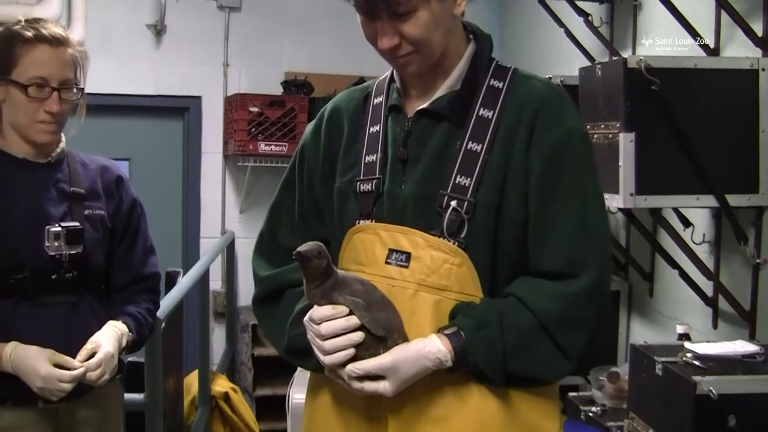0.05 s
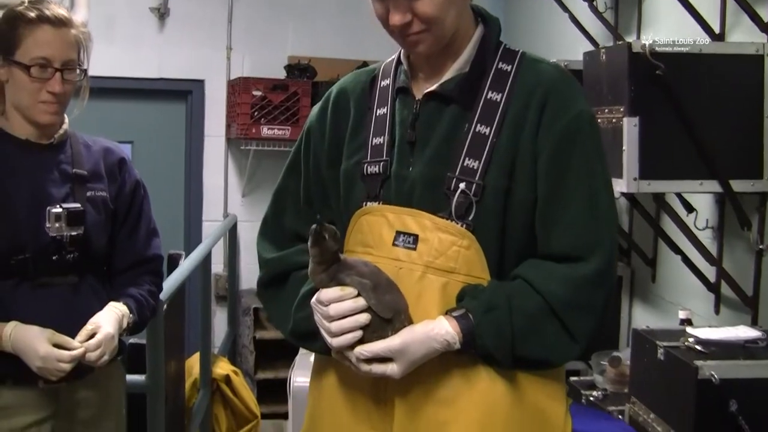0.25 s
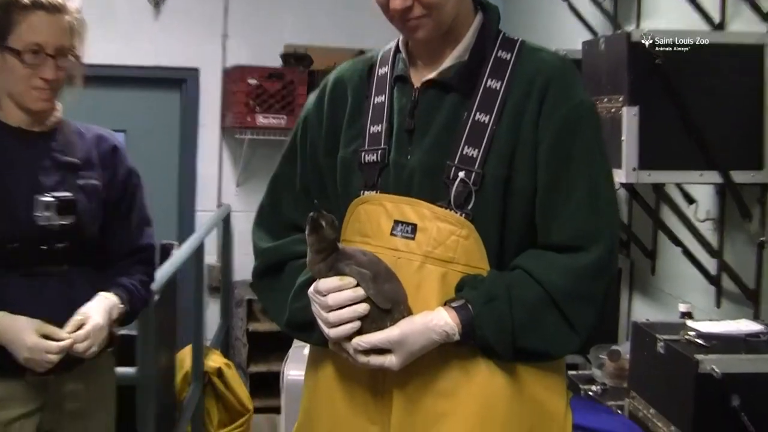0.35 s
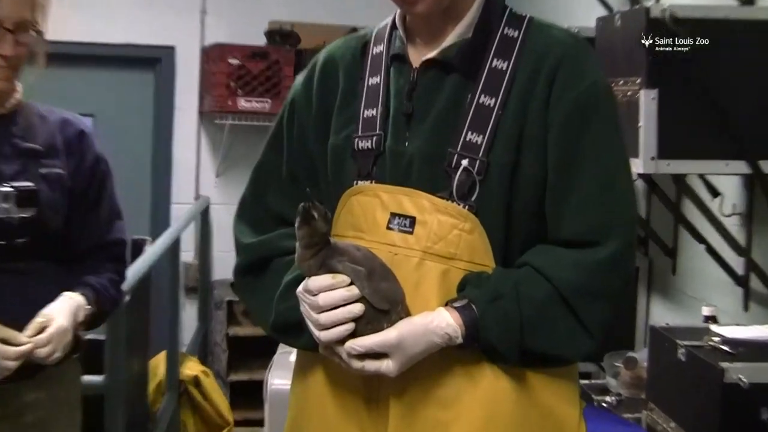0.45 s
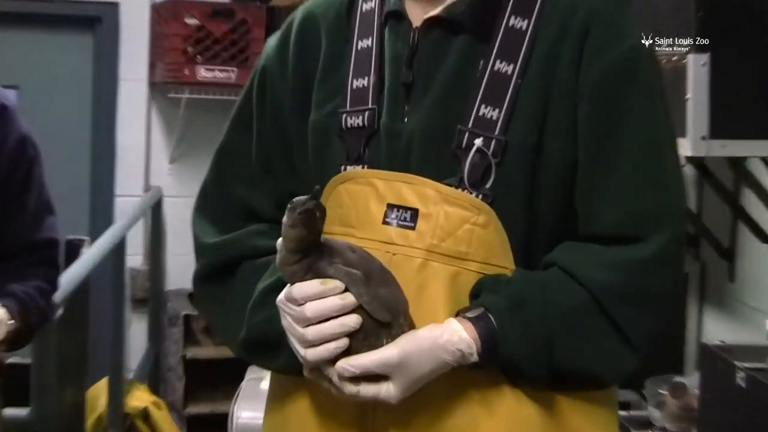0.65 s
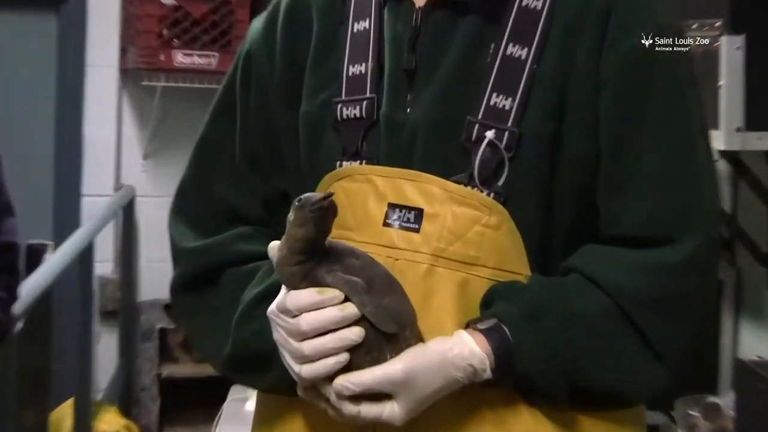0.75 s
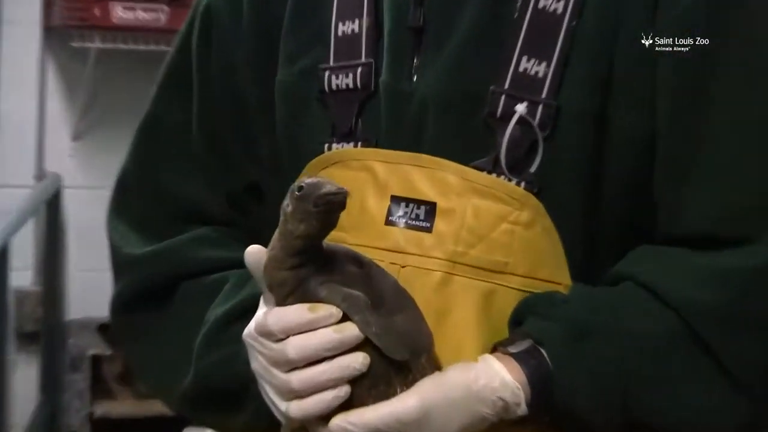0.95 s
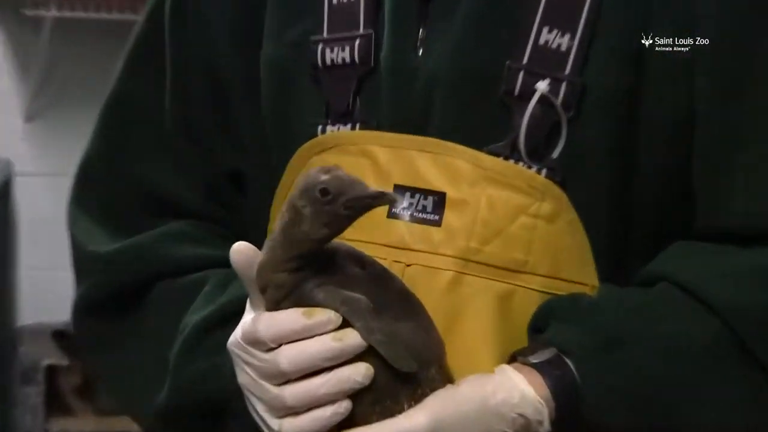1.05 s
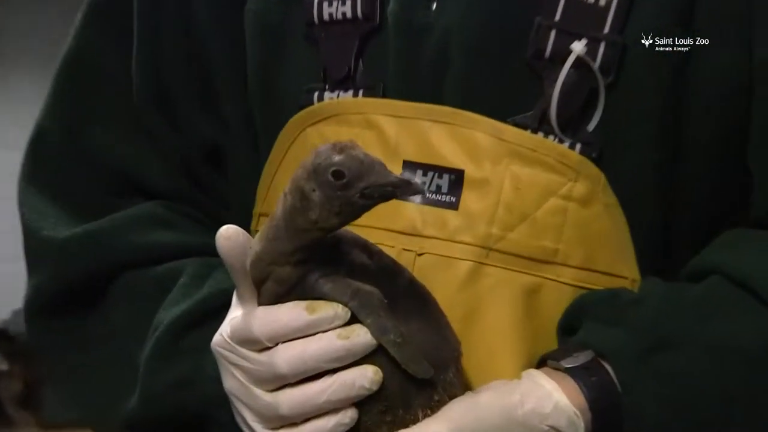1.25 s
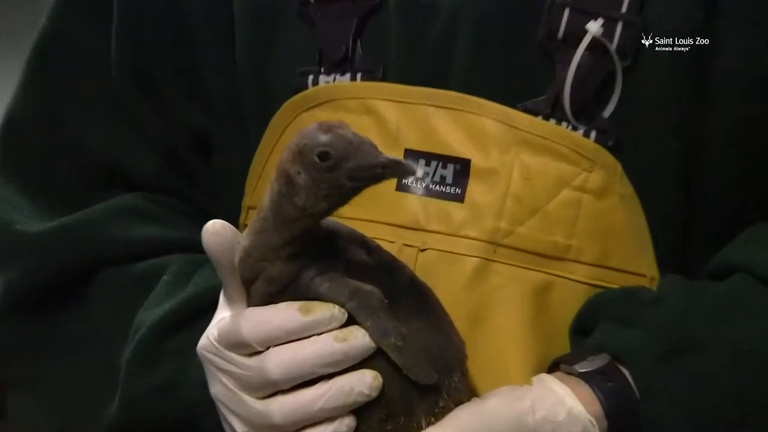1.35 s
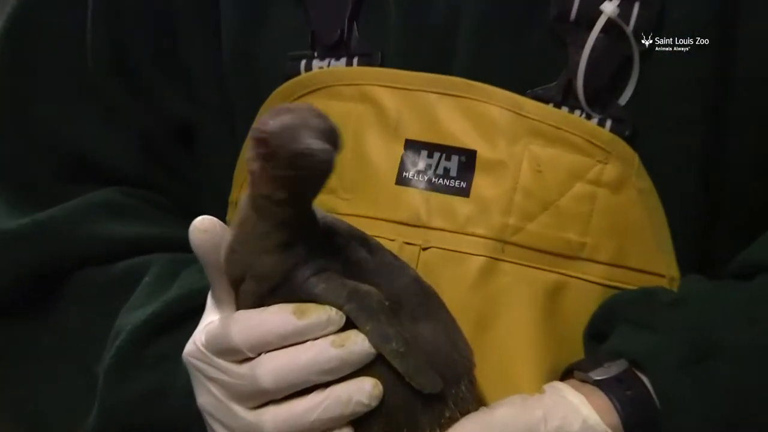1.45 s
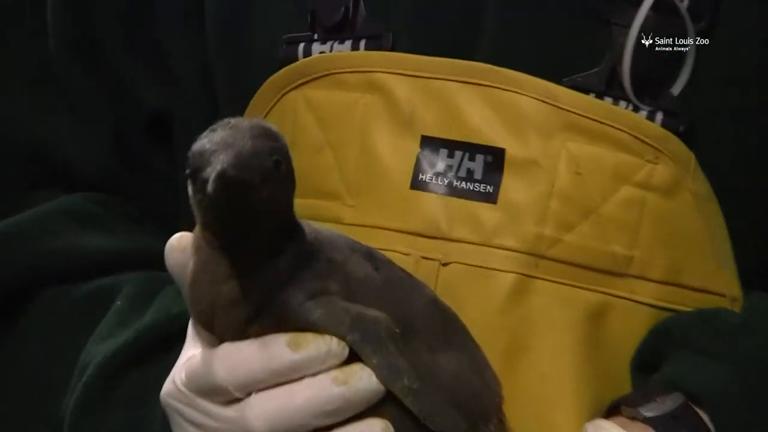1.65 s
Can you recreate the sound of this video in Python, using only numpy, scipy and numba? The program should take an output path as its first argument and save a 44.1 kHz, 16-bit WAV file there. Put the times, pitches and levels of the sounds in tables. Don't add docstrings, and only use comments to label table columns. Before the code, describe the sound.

Single shrill chick whistle rises, breaks into a hoarse lower note, over indoor ventilation hum

```python
import sys
import numpy as np
from scipy import signal
from scipy.fft import rfft, irfft
from scipy.io import wavfile
from scipy.ndimage import uniform_filter1d, map_coordinates
from numba import njit

SR = 44100
rng = np.random.default_rng(int(sys.argv[2]) if len(sys.argv) > 2 else 0)


def dump_mix(stems):
    frames = np.atleast_2d(stems).T
    limited = np.clip(frames, -1, 1)
    pcm = np.round(limited * 32767).astype(np.int16)
    wavfile.write(sys.argv[1], SR, pcm)


def voltage_ratio(level):
    return 10 ** (np.asarray(level, float) / 20)


N = 74970
t = np.arange(N) / SR

# pitch_hz [Hz], density_db [dB per Hz]
AIR_COLOUR = [(25, -24), (50, -23), (180, 0.5), (420, -11), (1270, -18.5), (3500, -25.5), (10000, -32),
              (15500, -41)]
# pitch_hz [Hz], width_hz [Hz], level_db [dB]
MACHINE_DRONES = [(31.4, 18.3, -36), (82.3, 11, -38.5), (125.6, 26.7, -33.5), (190.6, 38, -41.5),
                  (248.3, 23.6, -37.5), (2770, 180, -52)]
# pitch_hz [Hz], reverberation_s [s]
WALL_RING = [(1400, 0.22), (2800, 0.43), (5600, 0.41), (11000, 0.31)]
# time_s [s], pitch_hz [Hz]
WHISTLE_PITCH = [
    (.216, 3140),
    (.24, 3130),
    (.265, 3010),
    (.3, 3230),
    (.35, 3525),
    (.4, 3490),
    (.432, 3400),
]
# time_s [s], pitch_hz [Hz]
BROKEN_PITCH = [
    (.458, 2400),
    (.474, 2370),
    (.503, 2830),
    (.53, 2820),
    (.55, 2470),
    (.575, 2320),
    (.648, 2290),
    (.69, 2010),
]
# time_s [s], level_db [dB], hoarse_db [dB], overtones_db [dB], jitter [fraction of pitch]
STRAIN = [
    (.217, 1, -5, -13, 0),
    (.227, 3, -24.5, -1, 0.03),
    (.3, 15, -38, -9, 0),
    (.366, 4.5, -52, 10.5, 0.02),
    (.383, 1, -11, -4, 0.02),
    (.44, 2, -10.5, -3, 0),
    (.485, 0.5, -11, 7.5, .012),
    (.6, 2.5, -14.5, 12, 0),
    (.7, -2.5, -16, 10, 0),
]
# multiple [times the pitch], level_db [dB]
WHISTLE_OVERTONES = [(2, -19.5), (3, -27.5), (4, -32.5), (5, -33.5), (6, -38)]
# multiple [times the pitch], level_db [dB]
HALF_OVERTONES = [(1.5, 0), (2.5, -8), (3.5, -16)]
# middle_s [s], length_s [s], level_db [dB]
PERIOD_DOUBLINGS = [
    (.219, .006, -18),
    (.388, .02, -22),
    (.635, .05, -16),
]
# pitch_hz [Hz], gain_db [dB]
THROAT_COLOUR = [(4000, -0.5), (4700, 0), (5500, -6.5), (6100, 1.5), (7000, -1), (8500, 0.5), (11500, -0.5),
                 (15000, -4)]
# pitch_hz [Hz], density_db [dB per Hz]
HOARSE_COLOUR = [(1700, -25), (2300, -14), (3300, -1.5), (5000, -12), (6100, -12.5), (8000, -9),
                 (12000, -10.5), (16000, -23)]

TOP_HZ = 15750
HUM_DB, SWELL_DB, FLICKER_DB = -28, 1.5, 1.5
HUM_PAN_DB, HUM_LAG_S, HUM_APART_HZ = -3.8, .0001, 1600
ROOM_DB, ROOM_GAP_S = 1, 0.003
START_S, ATTACK_S, END_S, RELEASE_S = .2157, .003, 0.6883, 0.015
GLIDE_S, WAVER, WAVER_PER_S = 0.013, .0015, 40
CHICK_PAN_DB, CHICK_LAG_S = -3.5, -0.000032
LEFT_SHADE_HZ, LEFT_SHADE = 7040, 0.55
KNEE_DB, RATIO, RECOVER_DB_PER_S = -29.5, 2.356, 35.5
SENSE_S, DUCK_S = 0.024, .025


def level(x, db):
    return x * voltage_ratio(db) / np.sqrt(np.mean(x ** 2))


def curve(table, index):
    rows = np.array(table)
    return np.interp(t, rows[:, 0], rows[:, index])


def colour_db(table, hz):
    rows = np.array(table)
    return np.interp(np.log(hz), np.log(rows[:, 0]), rows[:, 1])


def band(x, hz, width_hz):
    edges = [max(hz - width_hz / 2, 5), min(hz + width_hz / 2, .49 * SR)]
    return signal.sosfilt(signal.butter(2, edges, "band", fs=SR, output="sos"), x)


def walk(rate):
    hold = int(SR / rate)
    held = rng.standard_normal(1000)[np.arange(N) // hold % 1000]
    return 1.3 * uniform_filter1d(uniform_filter1d(held, hold), hold)


def pair(x, pan_db, lag_s):
    late = map_coordinates(x, [(t - lag_s) * SR], mode="nearest")
    return np.array([late * voltage_ratio(pan_db / 2), x * voltage_ratio(-pan_db / 2)])


def ventilation():
    air = 0
    swell = walk(1.33)
    for hz in 25 * 2 ** np.arange(0, 9.4, 1 / 3):
        shared, left, right = band(rng.standard_normal((3, N)), hz, hz / 4)
        apart = min(hz / HUM_APART_HZ, 1) ** 1.3
        both = np.sqrt(1 - apart) * pair(shared, 0, HUM_LAG_S) + np.sqrt(apart) * np.array([left, right])
        air = air + voltage_ratio(colour_db(AIR_COLOUR, hz) + SWELL_DB * swell + FLICKER_DB * walk(11.68)) * both
    return level(air, HUM_DB)


def machines():
    return sum(level(band(rng.standard_normal(N), hz, width), db) for hz, width, db in MACHINE_DRONES)


def hum():
    return (ventilation() + machines()) * voltage_ratio(np.array([[HUM_PAN_DB], [-HUM_PAN_DB]]) / 2)


def room(x):
    tail = 0
    for hz, t60 in WALL_RING:
        tail = tail + band(rng.standard_normal((2, N)), hz, .7 * hz) * voltage_ratio(-60 * t / t60)
    tail = tail * np.clip(t / ROOM_GAP_S - 1, 0, 1)
    tail = tail * voltage_ratio(ROOM_DB) / np.sqrt(np.sum(tail ** 2) / 2) / 2
    return signal.fftconvolve(x, tail, axes=1)[:, :N]


def partials(rows, hz, phase):
    total = 0
    for multiple, db in rows:
        line_db = db + colour_db(THROAT_COLOUR, multiple * hz) + 4.7 * walk(81.02)
        total = total + voltage_ratio(line_db) * np.sin(multiple * phase) * (multiple * hz < TOP_HZ)
    return total


def hoarse_air():
    bins_hz = np.arange(N // 2 + 1) * SR / N + 1
    air = irfft(rfft(rng.standard_normal(N)) * voltage_ratio(colour_db(HOARSE_COLOUR, bins_hz)), N)
    return level(air, 0) * voltage_ratio(2.2 * walk(120))


def chick():
    jitter = curve(STRAIN, index=4)
    hz = uniform_filter1d(curve(WHISTLE_PITCH + BROKEN_PITCH, index=1), int(GLIDE_S * SR))
    hz = hz * (1 + WAVER * walk(WAVER_PER_S) + jitter * walk(500))
    phase = 2 * np.pi * np.cumsum(hz) / SR
    whistle = np.sin(phase) * voltage_ratio(174 * jitter * walk(300))
    overtones = voltage_ratio(curve(STRAIN, index=3)) * partials(WHISTLE_OVERTONES, hz, phase)
    doubling = sum(voltage_ratio(db) * np.exp(-(2 * (t - middle) / length) ** 2)
                   for middle, length, db in PERIOD_DOUBLINGS)
    half_lines = doubling * partials(HALF_OVERTONES, hz, phase)
    hoarse = voltage_ratio(curve(STRAIN, index=2)) * hoarse_air()
    gate = np.clip((t - START_S) / ATTACK_S, 0, 1) * np.exp(-np.maximum(t - END_S, 0) / RELEASE_S)
    return (whistle + overtones + half_lines + hoarse) * gate * voltage_ratio(curve(STRAIN, index=1))


def scene():
    near = pair(chick(), CHICK_PAN_DB, CHICK_LAG_S)
    return near + room(near) + hum()


@njit
def follow(want, fall, rise):
    out, gain = np.empty(len(want)), 0.
    for i in range(len(want)):
        if want[i] < gain:
            gain += (want[i] - gain) * fall
        else:
            gain += min(want[i] - gain, rise)
        out[i] = gain
    return out


def gain_control(dry):
    power = uniform_filter1d(np.mean(dry ** 2, axis=0), int(SENSE_S * SR))
    over_db = np.maximum(10 * np.log10(power + 1e-12) - KNEE_DB, 0)
    return follow(-over_db * (1 - 1 / RATIO), 1 / (DUCK_S * SR), RECOVER_DB_PER_S / SR)


def band_limit(x):
    return signal.sosfilt(signal.butter(12, 15750, fs=SR, output="sos"), x)


def record(dry):
    treble = signal.sosfilt(signal.butter(2, LEFT_SHADE_HZ, "high", fs=SR, output="sos"), dry[0])
    x = np.array([dry[0] - LEFT_SHADE * treble, dry[1]]) * voltage_ratio(gain_control(dry))
    rounded = np.tanh(1.1 * x) / 1.1
    mix = signal.sosfilt(signal.ellip(12, .2, 80, TOP_HZ, fs=SR, output="sos"), rounded)
    return band_limit(mix)


dry = scene()
out = record(dry)
dump_mix(out)
```